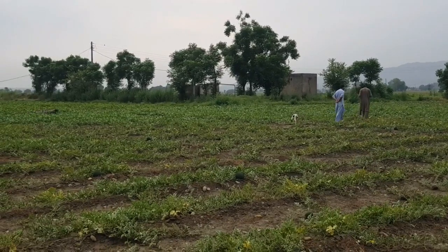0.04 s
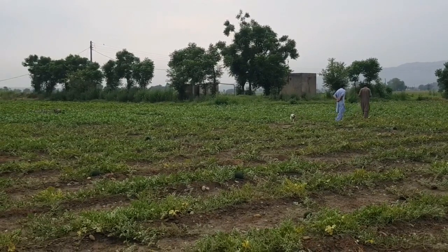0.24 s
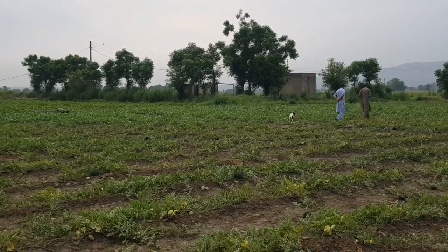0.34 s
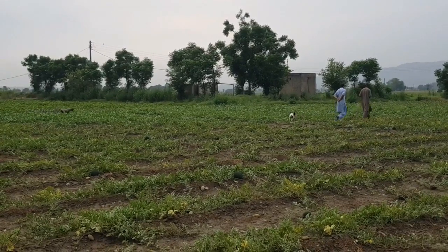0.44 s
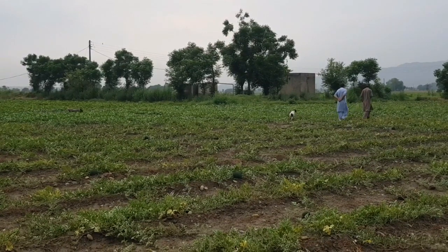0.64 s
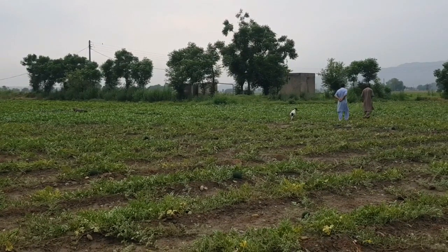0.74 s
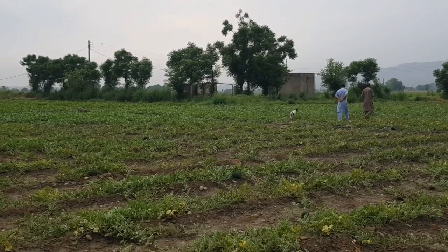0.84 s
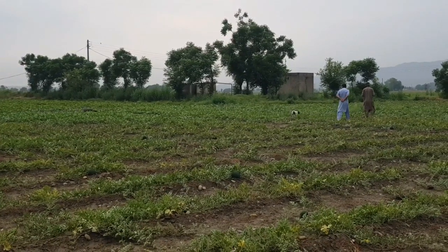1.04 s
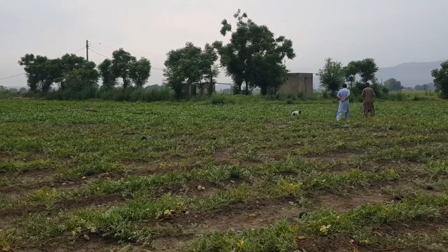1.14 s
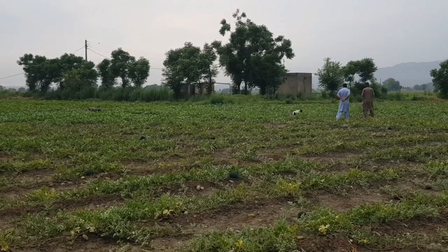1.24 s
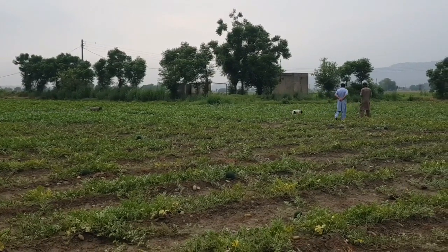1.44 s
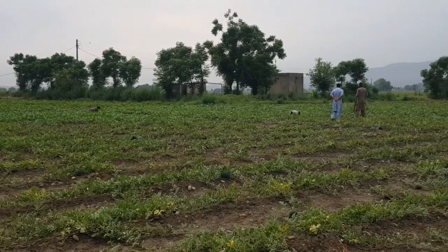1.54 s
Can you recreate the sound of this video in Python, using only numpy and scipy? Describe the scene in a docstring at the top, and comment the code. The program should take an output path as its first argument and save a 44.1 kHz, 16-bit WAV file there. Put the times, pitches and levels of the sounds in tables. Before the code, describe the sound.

A quail calls from the right in an open field, giving very short rising whistles, clipped pips and soft hoarse notes until about 0.5 seconds. A louder run follows from 0.8 to 1.3 seconds, echoing faintly. Light wind bumps the microphone around 0.3 and 1.25 seconds. Leaves barely rustle twice beneath the calls, and a distant bird's faint high notes come through quiet hiss near 1.4 seconds.

```python
"""Light wind bumps the microphone over the quiet hiss of an open field. Almost at once a quail calls from the
right: two runs of very short whistles, each sliding up and ending in a quick upward flick. Hoarse notes and
clipped pips fall between them. Nearby plants, the ground and far trees scatter the calls into a faint echo.
Leaves rustle twice, and faint high distant calls sound now and then."""
import sys
import numpy as np
from scipy import signal
from scipy.fft import rfft, irfft, next_fast_len
from scipy.io import wavfile
from scipy.ndimage import uniform_filter1d, map_coordinates

SR = 44100
rng = np.random.default_rng(int(sys.argv[2]) if len(sys.argv) > 2 else 0)


def int16_out(signal):
    """Quantize to a 16-bit WAV file."""
    q = np.round(np.clip(np.atleast_2d(signal).T, -1, 1) * 32767)
    wavfile.write(sys.argv[1], SR, q.astype(np.int16))


N = 70560  # 1.6 seconds


def amp(db):
    """Turn decibels into a volume multiplier."""
    return 10 ** (np.asarray(db) / 20)


def along(points, hz):
    """Read a table of (pitch, value) points at any pitch."""
    pitches, values = np.transpose(points)
    return np.interp(np.log(hz + 1), np.log(pitches + 1), values)


def curve(points):
    """Join (time, value) points with straight lines."""
    return np.interp(np.arange(N) / SR, *np.transpose(points))


def wobble(rate, size):
    """A smooth curve through `rate` random values a second."""
    return map_coordinates(rng.standard_normal(4000), [np.arange(size) * rate / SR], mode="wrap")


def filtered(sound, response):
    """Multiply each frequency in a sound by response(hz)."""
    size = next_fast_len(N + SR // 2)
    return irfft(rfft(sound, size) * response(np.fft.rfftfreq(size, 1 / SR)), size)[..., :N]


def add(track, start_s, sound):
    """Mix a sound in at its start time."""
    i = max(0, round(start_s * SR))
    track[i:i + len(sound)] += sound[:max(0, N - i)]


def stereo_noise(tone, likeness):
    """Noise shaped by a tone table; likeness near 1 makes both ears hear the same."""
    def response(hz):
        angle = np.arccos(np.clip(along(likeness, hz), -.99, .99)) / 2
        return amp(along(tone, hz)) * np.array([np.cos(angle), np.sin(angle)])
    middle, side = filtered(rng.standard_normal((2, N)), response)
    return np.array([middle + side, middle - side]) / middle.std()


# How hard the wind blows: time_s, level_db
GUSTS = [(0, -58), (.03, -48), (.07, -68.5), (.11, -58.5), (.145, -44.5), (.168, -59.5), (.2, -57),
         (.23, -40.5), (.255, -52.5), (.28, -30), (.305, -46.5), (.335, -52), (.39, -36.5), (.435, -53.5),
         (.46, -61), (.5, -54), (.55, -65), (.6, -79.5), (.68, -66), (.742, -69), (.778, -60),
         (.816, -70.5), (.898, -61.5), (.945, -80.5), (.98, -64.5), (1.02, -61), (1.1, -76), (1.14, -68.5),
         (1.17, -58), (1.234, -59.5), (1.247, -46.5), (1.27, -45), (1.292, -69), (1.31, -54.5),
         (1.38, -65.5), (1.45, -62), (1.48, -69), (1.51, -62), (1.6, -84)]
# The wind's deep tone: pitch_hz, relative_db
RUMBLE_TONE = [(13, -53), (22, -9), (38, -7), (59, 1.5), (87, -5), (110, -7), (170, -17.5), (237, -22),
               (348, -34), (556, -41), (739, -49.5), (1200, -61), (2640, -120)]
# The strongest puffs: start_s, pitch_hz, level_db
THUMPS = [(0.215, 69.8, -38), (.264, 85.7, -32.5), (0.377, 71, -46.5), (1.236, 54.6, -43)]

def wind():
    """Gusts rumble on the microphone; the strongest puffs give a short thump."""
    rumble = stereo_noise(RUMBLE_TONE, likeness=[(60, 0.51)])
    power = uniform_filter1d(np.mean(rumble ** 2, axis=0), size=1100)
    even_rumble = rumble / np.sqrt(np.abs(power) + 1e-9)  # so the gusts set the loudness
    thumps, t = np.zeros(N), np.arange(SR // 8) / SR
    rise_s = 0.0047
    swell = (t / rise_s) ** 2 * np.exp(-t / rise_s)
    for start_s, pitch_hz, level_db in THUMPS:
        add(thumps, start_s, amp(level_db) * swell / swell.max() * np.sin(2 * np.pi * pitch_hz * t))
    return (even_rumble * amp(curve(GUSTS)) + thumps) * amp([[-2], [2]])  # louder on the right


# Tones of the hiss, the hush and the leaves: pitch_hz, relative_db
HISS_TONE = [(150, -11), (250, -1), (400, -2), (700, -2), (1200, -6), (2000, -4), (2600, -10.5),
             (4300, -13), (8180, -22), (12200, -10), (15500, -9.5)]
HUSH_TONE = [(300, -27), (700, -9), (1200, -5), (1600, 1), (2100, -1.5), (2800, -14.5), (3600, -17.5),
             (4500, -11), (6000, -15.5), (9000, -56)]
RUSTLE_TONE = [(1500, -31), (2800, -1.5), (3500, -5.5), (5000, -6.5), (7000, -18.5), (10000, -48)]
# Loudness of the hush and the leaves: time_s, level_db
HUSH_LEVEL = [(0, -85), (.5, -88.5), (.8, -86), (1.2, -82), (1.35, -82.5), (1.6, -82.5)]
RUSTLE_LEVEL = [(0, -100), (.18, -99), (.24, -86.5), (.31, -84), (.37, -92), (.5, -102), (.78, -100),
                (.86, -91), (.97, -85), (1.08, -96), (1.25, -100)]
# How alike the field sounds in both ears: pitch_hz, likeness (0 to 1)
EAR_LIKENESS = [(300, 0.13), (2000, 0.1), (5000, 0.023)]

def field():
    """A steady hiss, a distant hush that dips then grows, and two brief rustles of leaves."""
    hiss = amp(-78.5) * stereo_noise(HISS_TONE, EAR_LIKENESS)
    hush = amp(curve(HUSH_LEVEL)) * stereo_noise(HUSH_TONE, EAR_LIKENESS)
    rustle = amp(curve(RUSTLE_LEVEL)) * stereo_noise(RUSTLE_TONE, EAR_LIKENESS)
    return hiss + hush + rustle


def whistle(pitch_hz):
    """A slightly unsteady tone with a faint overtone an octave up."""
    wavering_hz = pitch_hz * (1 + 0.027 * wobble(676, len(pitch_hz)))
    phase = 2 * np.pi * np.cumsum(wavering_hz) / SR
    return np.sin(phase) + amp(-46) * np.sin(2 * phase)


# The quail's whistles: start_s, length_s, start_hz, rise_hz, level_db, end_boost_db
CHIRPS = [(0.052, .020, 1716, 815, -53.5, 3.5), (0.1122, 0.02, 1593, 1110, -44, -0.5),
          (0.212, 0.034, 1842, 730, -52.5, 5.5), (0.2281, 0.02, 1602, 1076, -40.5, 0),
          (0.334, .019, 1755, 816, -55, 3.5), (0.832, 0.018, 1566, 1235, -46, 6),
          (0.953, .021, 1750, 845, -46.5, 4), (1.041, .018, 1587, 1048, -35, -2),
          (1.1135, 0.022, 1785, 768, -37, -4), (1.1582, 0.017, 1581, 1097, -32, -2),
          (1.231, 0.023, 1760, 808, -42, 0)]
# How each one swells and fades: progress (0 to 1), relative_db
CHIRP_SWELL = [(0, -26), (.17, -12.5), (.32, 0.5), (.47, 0.5), (.65, -13.5), (.82, -11.5), (1, -28)]

def quail_chirps():
    """Each whistle climbs steadily, is loudest early and fades in a last upward flick."""
    out = np.zeros(N)
    flick_hz = 790
    for start_s, length_s, start_hz, rise_hz, level_db, end_boost_db in CHIRPS:
        progress = np.arange(int(length_s * SR)) / (length_s * SR)
        swell_db = np.interp(progress, *np.transpose(CHIRP_SWELL)) + end_boost_db * progress ** 2
        volume = amp(level_db + swell_db) * signal.windows.tukey(len(progress), .1)
        pitch_hz = start_hz + rise_hz * progress + flick_hz * progress ** 10  # the flick comes late
        add(out, start_s, volume * whistle(pitch_hz))
    return out


def echo(sound, delay_s, fade_s):
    """Many tiny reflections, different at each ear, dying away by 60 dB in fade_s."""
    t = np.arange(SR) / SR - delay_s
    tail = rng.standard_normal((2, SR)) * (t > 0) * amp(-60 * np.abs(t) / fade_s)
    tail /= np.linalg.norm(tail, axis=1, keepdims=True)
    return signal.fftconvolve(sound[None], tail, axes=1)[:, :N]


def rough_note(pitch_hz, width_hz):
    """A narrow band of noise that follows a pitch and fades at both ends."""
    size = len(pitch_hz)
    blur = wobble(width_hz, size) + 1j * wobble(width_hz, size)
    tone = np.exp(2j * np.pi * np.cumsum(pitch_hz) / SR)
    return signal.windows.tukey(size) * (blur * tone).real


# The quail's hoarse notes: start_s, length_s, start_hz, end_hz, width_hz, level_db
HOARSE_NOTES = [(0.153, 0.069, 2600, 1774, 1003, -70.5), (0.367, 0.019, 2068, 2107, 200, -60),
                (.983, 0.037, 2116, 2090, 212, -69), (1.081, 0.042, 2750, 2170, 1157, -66)]

def quail_hoarse_notes():
    """Soft rough notes between the whistles, nearly steady or sliding down."""
    out = np.zeros(N)
    for start_s, length_s, start_hz, end_hz, width_hz, level_db in HOARSE_NOTES:
        pitch_hz = np.linspace(start_hz, end_hz, int(length_s * SR))
        add(out, start_s, amp(level_db) * rough_note(pitch_hz, width_hz))
    return out


# Faint distant calls: start_s, length_s, pitch_hz, level_db
FAR_CALLS = [(0.264, 0.058, 3380, -82), (1.007, 0.028, 4400, -87.5), (1.361, 0.052, 4350, -86.5),
             (1.503, 0.066, 4480, -85)]

def distant_calls():
    """Faint high calls, blurred on their long way over."""
    out = np.zeros(N)
    for start_s, length_s, pitch_hz, level_db in FAR_CALLS:
        call = rough_note(np.full(int(length_s * SR), pitch_hz), width_hz=380)
        add(out, start_s, amp(level_db) * call)
    return out


# The quail's clipped notes: start_s, pitch_hz, level_db
PIPS = [(.2655, 2002, -44.5), (.382, 2047, -50), (.487, 2087, -64)]

def quail_pips():
    """Tiny rising whistles that stop short, with no flick."""
    out = np.zeros(N)
    length_s, rise_hz_per_s = 0.0114, 36000
    t = np.arange(int(length_s * SR)) / SR
    slide_hz = rise_hz_per_s * (t - length_s / 2)
    for start_s, pitch_hz, level_db in PIPS:
        add(out, start_s, amp(level_db) * np.hanning(len(t)) * whistle(pitch_hz + slide_hz))
    return out


# How far the quail's sound in the left channel is ahead in phase of the right, varying with pitch (minus is
# behind): pitch_hz, lead_radians
LEFT_EAR_LEAD = [(1800, -0.73), (2100, -1), (2500, 1.9)]

def scene():
    """The quail off to the right with its echoes, the distant calls, the wind and the field."""
    quail = quail_chirps() + quail_pips() + quail_hoarse_notes()
    direct = filtered(quail, lambda hz: np.exp(1j * along(LEFT_EAR_LEAD, hz) * np.array([[.5], [-.5]])))
    ground_and_plants = amp(-7.5) * echo(quail, delay_s=0.0013, fade_s=0.077)
    near = (direct + ground_and_plants) * amp([[-10.5], [0]])  # quieter on the left
    far_trees = amp(-17.5) * echo(quail, delay_s=0.023, fade_s=0.4) * amp([[-3], [0]])
    return near + far_trees + distant_calls() + wind() + field()


def record(dry):
    """Cut away the very highest treble."""
    return filtered(dry, lambda hz: hz < 15800)


dry = scene()
out = record(dry)
int16_out(out)
```